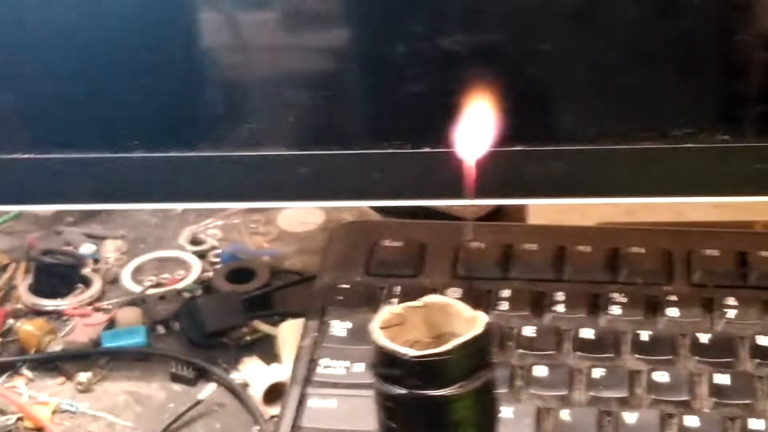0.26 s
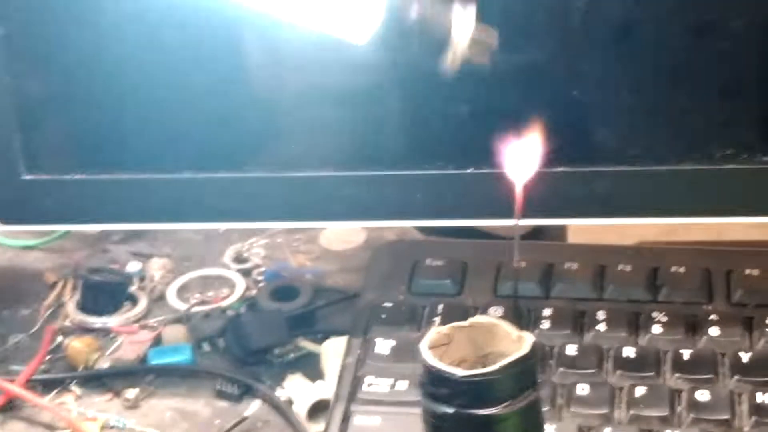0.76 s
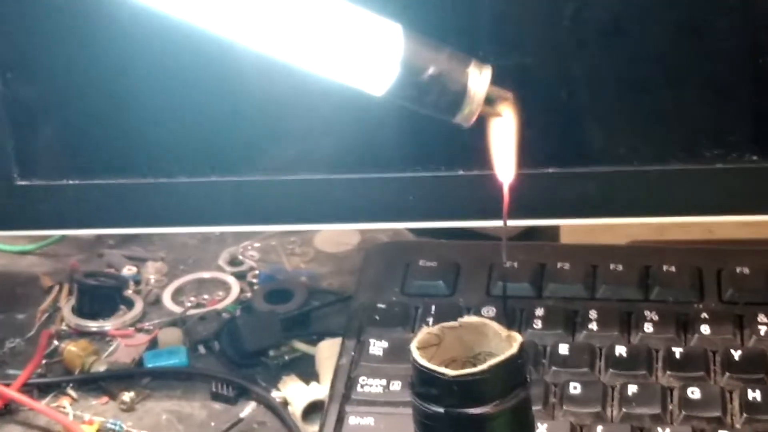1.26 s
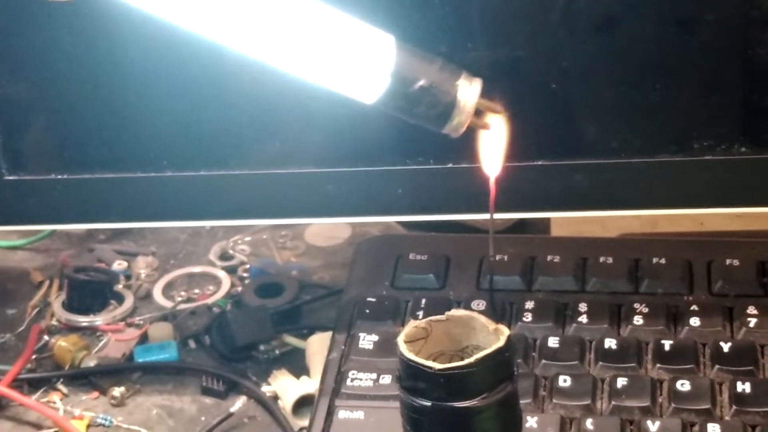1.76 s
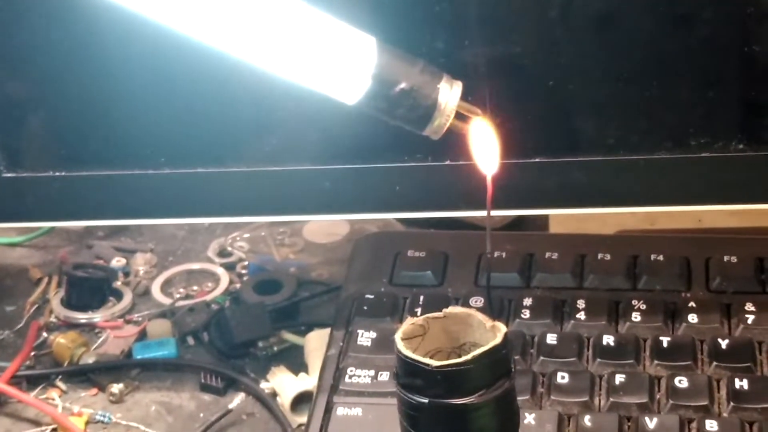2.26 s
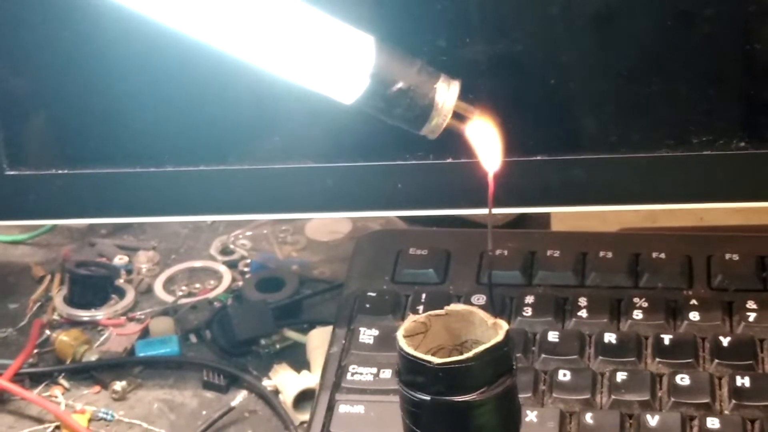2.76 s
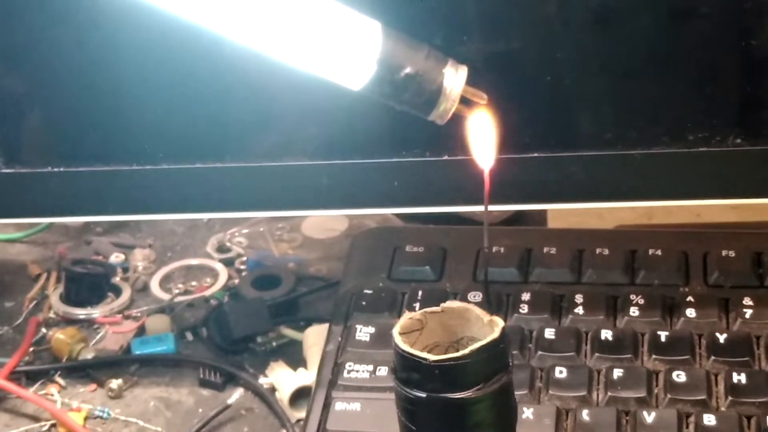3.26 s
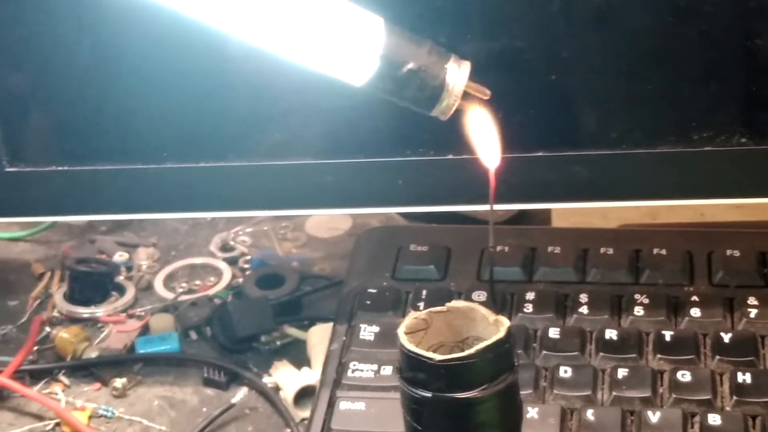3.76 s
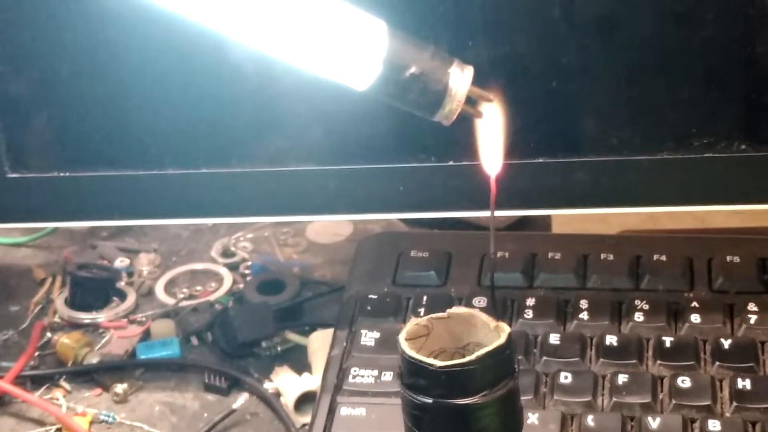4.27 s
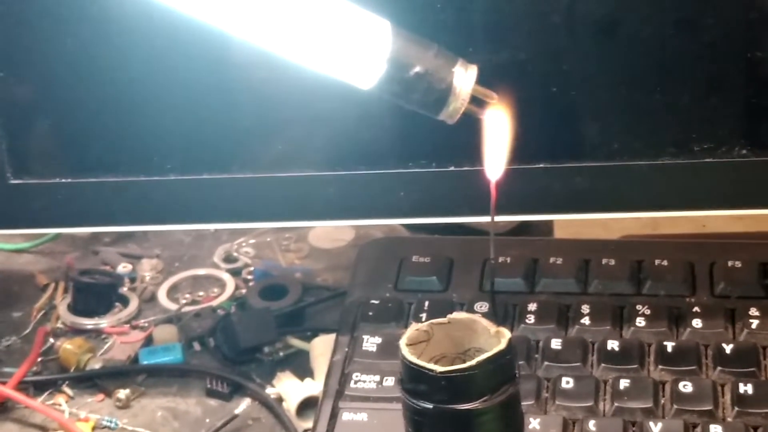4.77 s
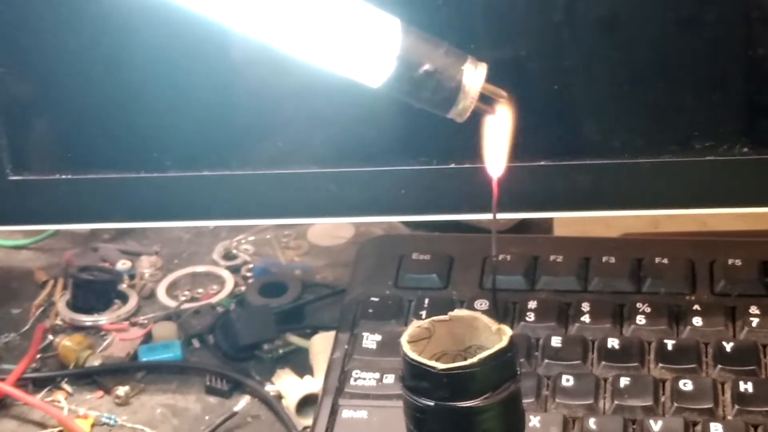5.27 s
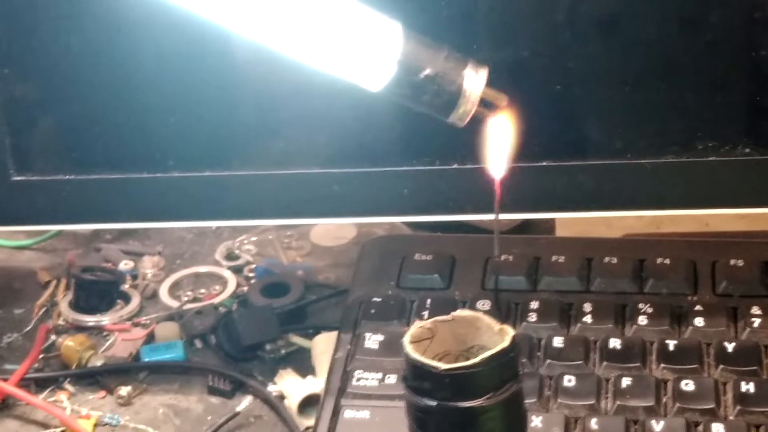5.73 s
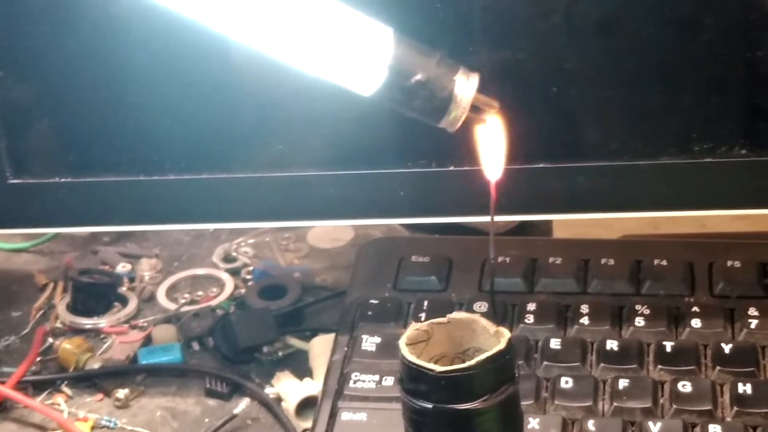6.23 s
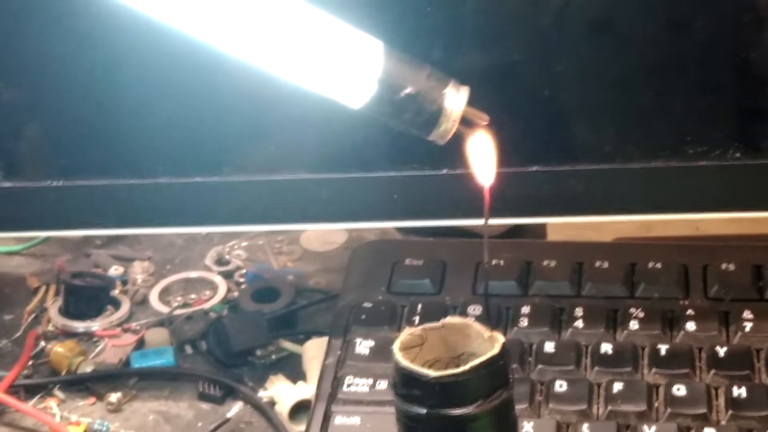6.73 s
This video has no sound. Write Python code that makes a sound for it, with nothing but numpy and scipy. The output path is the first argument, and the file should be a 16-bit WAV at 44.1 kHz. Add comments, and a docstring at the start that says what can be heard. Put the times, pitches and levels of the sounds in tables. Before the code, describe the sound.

After a second of fan noise with a dull knock and a tick, an electric flame spits bright, dense, uneven crackles until the end.

```python
"""Plasma arc on a workbench

A small plasma flame burns on a wire tip; a lamp tube is brought to it and the arc spits and sizzles.
Each spit is a burst of tiny random discharges, echoed by the bench and the room, after one dull knock and a tick.
A cooling fan adds shaped noise and lines at multiples of its shaft rate, and the mains adds a steady hum.
Two microphone ports hear it, and each channel subtracts the delayed sound of the other port."""
import sys
import numpy as np
from scipy import signal
from scipy.fft import rfft, irfft
from scipy.io import wavfile
from scipy.ndimage import uniform_filter1d

SR = 44100
rng = np.random.default_rng(int(sys.argv[2]) if len(sys.argv) > 2 else 0)


def waveform_to_disk(signal):
    """Save audio, clipped to [-1, 1], as 16-bit WAV at the path in sys.argv[1]."""
    frames = np.transpose(np.atleast_2d(signal))
    scaled = np.clip(frames, -1, 1) * 32767
    samples = np.round(scaled).astype(np.int16)
    wavfile.write(sys.argv[1], SR, samples)


def volts_from_decibels(level):
    """Turn decibel levels (scalar or array-like) into linear amplitude factors."""
    exponent = np.asarray(level, float) / 20
    return 10 ** exponent


N = 308700

# loud and lone spits of the arc: start_s [s], level_db [relative dB], length_ms [ms],
# low_db [dB, weight of the lower crackle]
SPITS = [(1.191, -47.5, 1.2, 10.5), (1.2112, -38.5, 1.8, 0), (1.224, -38, 1.7, -11), (1.3422, -36, 4.3, 0),
         (1.38, -29.5, 2, -2.5), (1.397, -41, 1.7, -3), (1.4137, -35, .3, -5), (1.45, -37, 2.2, -3),
         (1.4935, -37.5, 6.5, -1), (1.5133, -43, 1.5, 4), (1.5214, -38.5, 13.4, 1),
         (1.5694, -39.5, 4.4, -3), (1.594, -37, 1.9, -4), (1.622, -35, 1.8, -1), (1.7025, -34, 3, -6),
         (1.711, -37.5, 7.6, -3), (1.724, -37, 4.3, -7), (1.7487, -42, 1.8, 0), (1.794, -42, 6.3, -3),
         (1.851, -44.5, 1.2, 6), (1.8974, -38, 0.62, -1), (1.9078, -38, .6, 2), (1.93, -37.5, 1.4, -1),
         (1.9539, -44, 1.5, 1), (1.968, -36, 3.9, 1), (1.9842, -36, 9.4, -0.5), (1.997, -37.5, 11.6, -6),
         (2.0224, -38, 2.2, -1), (2.058, -37.5, 1.5, 2), (2.093, -42, 2.2, 8), (2.132, -45, 1.5, -6),
         (2.14, -34.5, 0.31, -4), (2.1641, -36.5, 1.1, 1), (2.233, -37, 0.55, 3), (2.2617, -37, 1.8, 3),
         (2.2722, -35.5, 1.7, 1), (2.2916, -42, 14, 0), (2.3135, -32, 3.4, -3), (2.362, -38.5, 1.7, 5),
         (2.3682, -37.5, 3.9, -4), (2.3922, -35.5, 1.5, 5), (2.4225, -31, 4.5, -5), (2.436, -34, 1.5, 2),
         (2.442, -32.5, 4.3, -4), (2.462, -41, 3.9, -8), (2.481, -42, 0.65, 7), (2.504, -29.5, 0.32, -3),
         (2.523, -41, 1.3, 3), (2.538, -42, 1.4, 4), (2.568, -34.5, 0.27, -12), (2.672, -42, 2.4, -6),
         (2.7043, -42, 0.9, -5), (2.743, -43.5, 0.85, 11), (2.7827, -44, 1.5, -4),
         (2.7925, -36.5, 1.65, 6.5), (2.836, -38.5, 3.7, 1.5), (2.878, -33.5, 0.29, -4),
         (2.9475, -39.5, 1.5, 6), (2.962, -43, 13, -4), (2.9932, -35, 1.4, -4), (3.0008, -36, 5.2, 6.5),
         (3.025, -41, 22, 0), (3.049, -30, 4.3, -11), (3.0686, -39, 1.7, -5), (3.0874, -39, 1.3, 3),
         (3.0942, -44, 1.5, 10), (3.132, -33.5, 3.2, 4), (3.1516, -35.5, 2.9, -0.5),
         (3.171, -33, 11.4, -1.5), (3.1937, -37, 2.9, -6), (3.208, -36, 4.7, -1), (3.216, -37, 1.4, -7),
         (3.279, -45, 0.97, 12), (3.2897, -39, 1.7, 4), (3.3075, -41, 1.5, -3), (3.322, -43, 1.5, 2),
         (3.35, -40, 1.4, 4), (3.366, -36.5, 3.5, 3.5), (3.3895, -41, 1.3, -3), (3.3974, -33, 1.2, -3),
         (3.404, -32, 1.3, -3), (3.41, -35, 5.9, 0), (3.4501, -32, 2.7, -2), (3.456, -29, 5.9, -1),
         (3.4766, -37, 1.2, -9), (3.48, -43, 9.3, 5), (3.5004, -42, 4.5, 4), (3.529, -36, 2.5, 3),
         (3.553, -38, 1.4, 8), (3.5632, -30.5, 3.8, -5), (3.5861, -38.5, 2.8, -4), (3.6135, -40.5, 1.5, 3),
         (3.648, -33.5, 5.3, -16), (3.6884, -45.5, 6.4, 3), (3.784, -34.5, 0.44, 2.5),
         (3.911, -39, 0.57, -1), (3.939, -37.5, 4.6, 1), (3.9505, -36, 2.9, 2), (3.9729, -38, 1.3, -2),
         (3.984, -41, 1.3, -2), (4.023, -39, 1, 0), (4.0327, -40, 1.5, 2), (4.045, -37, 2.6, 2),
         (4.0587, -38, 2.1, 2), (4.082, -42.5, 1.9, 5), (4.1758, -40, 2, 4), (4.27, -41, 5.1, 1.5),
         (4.303, -43, 1.5, -2), (4.3607, -41, 6.2, -5), (4.397, -45, 1.4, -2), (4.4675, -43.5, 0.63, 10),
         (4.571, -50.5, 7.6, 7), (4.741, -46, 3.4, -1), (4.761, -43, 8, 2), (4.773, -38, 2.3, -2),
         (4.8083, -39.5, 1.5, -2), (4.8377, -42, 3.3, 4), (4.888, -40, 2, 3), (4.9979, -44, 1.5, -9),
         (5.022, -43.5, 0.25, 4), (5.065, -47, 1.5, 4), (5.1143, -43.5, 1.6, 5), (5.1362, -42.5, 3.2, 3),
         (5.22, -43, 2.9, 4), (5.275, -38.5, 2.8, -1), (5.288, -38, 2, -6), (5.32, -43, 5.6, 4),
         (5.331, -35.5, 3.5, -2), (5.399, -39, 1.5, 0), (5.406, -38, 2, 2), (5.412, -42.5, 8.6, 1),
         (5.4274, -32, 1.7, -10), (5.452, -38, 2.5, -7), (5.477, -46, 1.4, 0), (5.56, -34, 1.1, -21),
         (5.5933, -44, 1.5, 0), (5.6165, -45, 3.9, 3), (5.6686, -32, 1.26, -1), (5.7006, -41.5, 4.3, 3),
         (5.734, -36.5, 0.76, 7), (5.8, -37.5, 3.5, -6), (5.847, -45.5, 1.5, 3), (5.862, -46.5, 4.5, 5),
         (5.914, -43, 1.6, 6), (6.015, -38.5, 6.4, 5.5), (6.061, -35, 0.36, -1), (6.0972, -39, 1.8, 1),
         (6.1699, -33, 1.5, 5), (6.1826, -34.5, 4, -5), (6.191, -39, 1.3, -3), (6.228, -37, 3.5, -10),
         (6.3738, -40, 3.9, 3), (6.3955, -38, 1.6, 0), (6.399, -42, 14, 4), (6.4535, -43.5, 1.6, 2),
         (6.506, -40.5, 2.8, -1), (6.5253, -42, 1.4, 7), (6.5597, -39.5, 0.82, 6), (6.5905, -49, 1.1, 2),
         (6.612, -38.5, 4.2, -5), (6.6223, -31.5, 0.52, -7), (6.6865, -38.5, 0.29, 8),
         (6.7135, -41, 1.3, 2), (6.7159, -35, 4.2, 5), (6.7546, -33, 0.44, -8), (6.7638, -35.5, 2.1, 0),
         (6.826, -32, 4, -6), (6.8555, -37.5, 14.5, -0.5), (6.8739, -31, 0.44, -9),
         (6.8813, -36.5, 1.9, -4), (6.937, -35.5, 1.4, -11)]
# sizzle of small discharges, swelling while the lamp pins sit in the flame: time_s [s], level_db [relative dB]
SIZZLE = [(1.16, -82), (1.33, -67), (1.52, -51), (1.8, -61), (2.15, -57.5), (2.23, -53), (2.27, -39),
          (2.38, -50.5), (2.41, -54), (2.44, -53), (2.54, -49), (2.68, -63), (2.9, -58.5), (3.05, -46),
          (3.095, -47.5), (3.12, -62), (3.15, -45), (3.26, -51), (3.44, -46.5), (3.74, -60), (3.97, -61),
          (4.6, -68.5), (5.15, -62.5), (5.4, -59.5), (6.5, -58), (7, -63)]
# colour of one discharge: frequency_hz [Hz], level_db [relative dB]
ARC_COLOUR = [(1500, -6.5), (2500, -6), (4000, -3.5), (5800, -6.5), (7000, 0.5), (8500, -1), (10500, -1),
              (12300, -7), (14000, -10)]
# decay of the room: frequency_hz [Hz], t60_s [s, raised to 0.02 s where shorter]
ROOM_DECAY = [(1500, 0.017), (4000, 0.2), (8000, 0.1), (13000, 0.078)]
# spectrum of the fan air in the room: frequency_hz [Hz], density_db [relative dB per Hz]
AIR_SPECTRUM = [(38, -33), (55, 13), (80, -8), (170, -3), (420, 2.5), (750, -9.5), (1350, -15),
                (1850, -6.5), (2500, -15), (4400, -16.5), (5200, -23), (7800, -27.5), (10900, -25),
                (12600, -29.5)]
# slow swell of the fan air: time_s [s], level_db [relative dB]
AIR_SWELL = [(0, -53), (.5, -51.5), (.8, -54.5), (1.1, -56), (1.5, -51.5), (2, -53.5), (3, -53),
             (4.5, -53.5), (6, -53), (7, -54)]
# resonances of the fan housing: frequency_hz [Hz], width_hz [Hz], boost_db [dB]
HOUSING_MODES = [(239.7, 22, 9.5), (360, 16, 6), (395.4, 17, 4)]
# fan orders: order [multiple of the shaft rate], first_db [relative dB, first port],
# second_db [relative dB, second port], lead_rad [rad, lead of the second port]
FAN_ORDERS = [(5, -67, -69, -.65), (8, -66, -62, -1.1), (10, -63, -59, -.6), (12, -63, -73, -1),
              (14, -75, -68, -.7), (15, -70, -65, -2.1), (16, -67, -78, -1.6), (26, -73, -83, -.2),
              (28, -72, -78, -.4), (40, -61.5, -80, 2.9), (45, -68, -79, 1)]
# high orders from the motor windings: order [multiple of the shaft rate], level_db [relative dB, first port]
WINDING_ORDERS = [(82, -81), (86, -82), (90, -81), (94, -83), (98, -86), (253, -88), (257, -84), (261, -86)]
# drifting shaft rate, a little slower at the end: time_s [s], rate_hz [turns per s]
SHAFT_RATE = [(0, 40.6), (2.6, 40.63), (4.1, 40.53), (7, 40.51)]
# mains hum, one row: first_db, second_db [relative dB, each port], lead_rad [rad, lead of the second port]
MAINS_HUM = (-60, -64, -0.23)
# modes of the tick: frequency_hz [Hz], level_db [relative dB], t60_s [s]
TICK_MODES = [(1720, -7, 0.019), (3130, -10, 0.0073), (3550, -0.5, 0.012), (4280, -10, 0.011),
              (8560, -12, .004)]
# response of the second port against the first: frequency_hz [Hz], gain_db [dB]
FAR_PORT = [(60, -4), (130, 6), (300, -6), (1000, 3), (3000, -10), (7000, -0.5), (13000, -0.5)]
# share of the other port that is subtracted: frequency_hz [Hz], gain_db [dB]
CROSS_SHARE = [(60, -0.5), (140, -8), (300, -14), (1000, -2), (3000, 0), (7000, -7), (13000, -14.5)]

LEAD_MS, LEAD_SHARE, LEAD_RISE_MS = 5, .05, 1.0  # faint sparks build up before each spit
SNAP_DB, SNAP_MS = 13, 1.5  # extra spark at the peak of a spit; weaker the longer the spit is against SNAP_MS
FLUTTER_DB, FLUTTER_MS = 1.6, 1.2  # a spit burns in uneven clumps
TOP_SLOPE, TOP_SPREAD_DB = -.4, 2.0  # louder spits are duller at the top (dB per dB), and each differs
BENCH_MS, BENCH_DB = 0.711, -8  # echo off the bench top
ARC_SHADE_DB = -3  # the arc at the second port
ROOM_DB = -10
TICK_S, TICK_DB = .4988, -34
KNOCK_S, KNOCK_DB, KNOCK_HZ, KNOCK_T60_S = .1717, -32, 460, .03
MAINS_HUM_HZ = 120.1
PORT_MS = 0.4486  # travel time between the ports
RIGHT_TREBLE_DB = 3.0  # treble lift of the right channel
EDGE_HZ = 14100


def evened(x):
    """Normalisation: scales a signal to rms 1."""
    return x / np.sqrt(np.mean(x ** 2) + 1e-20)


def read(points, hz):
    """Interpolation: reads a spectrum on a log-frequency axis."""
    f, value = np.transpose(points)
    return np.interp(np.log(hz + 1), np.log(f + 1), value)


def curve(rows):
    """Interpolation: reads a curve of time at every sample."""
    s, value = np.transpose(rows)
    return np.interp(np.arange(N) / SR, s, value)


def shaped(x, response):
    """Linear filtering: multiplies the spectrum by a function of frequency."""
    return irfft(rfft(x) * response(np.fft.rfftfreq(N, 1 / SR)), N)


def drift(top_hz, count):
    """Superposition: slow sines of random phase make count wandering rows of rms 1."""
    t = np.arange(0, N + 441, 441) / SR
    rows = 0
    for f in np.geomspace(.3, top_hz, num=24):
        rows = rows + np.sin(2 * np.pi * (f * t + rng.random((count, 1)))) / np.sqrt(f)
    return np.array([np.interp(np.arange(N) / SR, t, evened(row)) for row in rows])


def discharges(size, per_s, spread_db):
    """Shot noise: tiny sparks of uneven size at random times; the ports hear different parts of the flame."""
    happens = rng.random(size) < per_s / SR
    height = volts_from_decibels(spread_db * np.minimum(rng.exponential(1, size), 3)) * happens
    return height[..., None, :] * rng.standard_normal((*size[:-1], 2, size[-1]))


def spits():
    """Enveloped shot noise: bursts swell, hold and die, longer ones more gradually; gives three tone layers."""
    bright, low, top = np.zeros((3, 2, N + 1200))
    t = np.arange(1200) / SR * 1000 - LEAD_MS  # ms from the start of the spit
    trains = discharges(size=(len(SPITS), len(t)), per_s=24000, spread_db=1.2)
    clumps = rng.standard_normal((len(SPITS), 1, len(t)))
    clumps = evened(uniform_filter1d(clumps, size=round(FLUTTER_MS / 1000 * SR), axis=2))
    trains = trains * volts_from_decibels(FLUTTER_DB * clumps)
    middle_db = np.median([row[1] for row in SPITS])
    chances = rng.standard_normal(len(SPITS))
    for (s, level_db, ms, low_db), train, chance in zip(SPITS, trains, chances):
        lead = LEAD_SHARE * np.exp(np.minimum(t, 0) / LEAD_RISE_MS)
        rise = np.clip(t / (.2 + .25 * ms), lead, 1)
        fall = np.exp(-np.maximum(t - ms, 0) / (.65 + .08 * ms))
        shape = np.sqrt(rise * fall)
        burst = shape * train / train.std()
        burst[:, np.argmax(shape)] += volts_from_decibels(SNAP_DB) * np.exp(-ms / SNAP_MS)
        # energy is set by level and length alone
        burst = burst * np.linalg.norm(shape) / np.linalg.norm(burst, axis=1, keepdims=True)
        top_db = TOP_SLOPE * (level_db - middle_db) + TOP_SPREAD_DB * chance
        at = round((s - LEAD_MS / 1000) * SR)
        bright[:, at:at + len(t)] += volts_from_decibels(level_db) * burst
        top[:, at:at + len(t)] += volts_from_decibels(level_db + top_db) * burst
        low[:, at:at + len(t)] += volts_from_decibels(level_db + low_db) * burst
    return bright[:, :N], low[:, :N], top[:, :N]


def sizzle():
    """Clustered shot noise: small random spits modulate a dense train of discharges."""
    t = np.arange(1200) / SR * 1000 - LEAD_MS  # ms
    small = volts_from_decibels(7 * np.minimum(rng.exponential(1, N), 2)) * (rng.random(N) < 220 / SR)
    small = abs(signal.oaconvolve(small, np.exp(np.minimum(t / 0.34, -t / 1.34)))[:N])
    lit = np.arange(N) / SR > SIZZLE[0][0]
    level = lit * volts_from_decibels(curve(SIZZLE)) * np.sqrt(0.015 + small / small.mean())
    return level * evened(discharges(size=(N,), per_s=9000, spread_db=2.5))


def arc():
    """Source and filter: spits and sizzle take the discharge colour and the comb of the bench reflection."""
    bright, low, top = spits()
    fizz = sizzle()

    def colour(hz):
        scatter = 1 / (1 + (hz / 10500) ** 6)  # the cluttered bench scatters the highest treble
        echo = 1 + volts_from_decibels(BENCH_DB) * scatter * np.exp(-2j * np.pi * hz * BENCH_MS / 1000)
        return volts_from_decibels(read(ARC_COLOUR, hz) + 6.0) * echo * hz ** 4 / (hz ** 4 + 1400 ** 4)

    high = lambda hz: 1 / (1 + (4800 / (hz + 1)) ** 4)
    airy = lambda hz: 1 / (1 + (10800 / (hz + 1)) ** 10)
    upper = shaped(bright + fizz, lambda hz: colour(hz) * high(hz) * (1 - airy(hz)))
    upper = upper + shaped(top + fizz, lambda hz: colour(hz) * airy(hz))
    lower = shaped(low + fizz, lambda hz: colour(hz) * (1 - high(hz)))
    return upper + lower


def tick():
    """Modal impact: something hard ticks once on the bench as a few decaying sines."""
    t = np.maximum(np.arange(N) / SR - TICK_S, 0)
    return sum(volts_from_decibels(TICK_DB + db - 60 * t / t60) * np.sin(2 * np.pi * hz * t) for hz, db, t60 in TICK_MODES)


def knock():
    """Modal impact: one low decaying sine, struck once, makes a dull knock."""
    t = np.maximum(np.arange(N) / SR - KNOCK_S, 0)
    return volts_from_decibels(KNOCK_DB - 60 * t / KNOCK_T60_S) * np.sin(2 * np.pi * KNOCK_HZ * t)


def room(x):
    """Reverberation: sparse reflections of random sign, each band dying at its own speed."""
    taps = np.zeros((2, SR // 2))
    starts = np.arange(100, SR // 2 - 20, 20)
    at = starts + rng.integers(0, 20, (2, len(starts)))
    np.put_along_axis(taps, at, rng.choice([-1., 1.], at.shape), 1)
    hz, t, z = signal.stft(taps, SR, nperseg=128)
    t60 = np.maximum(read(ROOM_DECAY, hz), .02)
    tail = signal.istft(z * volts_from_decibels(-60 * t / t60[:, None]), SR, nperseg=128)[1]
    return signal.fftconvolve(x, tail / np.linalg.norm(tail[0]), axes=1)[:, :N]


def fan_air():
    """Turbulence noise: a broad rush with drifting patches; the slow swell fades out towards the treble."""
    frames, hz = N // 1024 + 5, np.fft.rfftfreq(4096, 1 / SR)
    z = rng.standard_normal((frames, 2049, 5)).T
    patches = uniform_filter1d(uniform_filter1d(z[4], size=12, axis=0), size=3, axis=1)  # Hz, then time
    s, rush_db = np.transpose(AIR_SWELL)
    swell_db = np.interp(np.arange(frames) * 1024 / SR, s, rush_db) - rush_db.mean()
    housing_db = sum(db / (1 + (2 * (hz - centre_hz) / width) ** 2) for centre_hz, width, db in HOUSING_MODES)
    follows = 1 / (1 + (hz[:, None] / 1500) ** 2)
    spectrum_db = (read(AIR_SPECTRUM, hz) + housing_db)[:, None]
    z = (z[:2] + 1j * z[2:4]) * volts_from_decibels(spectrum_db + 1.3 * evened(patches) + follows * swell_db)
    air = signal.istft(z, nperseg=4096, noverlap=3072)[1][:, :N]
    return volts_from_decibels(rush_db.mean() + 7.0) * evened(air)


def steady_tones():
    """Periodic forcing: lines at shaft multiples and the mains hum, wavering in level and phase."""
    shaft, out = np.cumsum(curve(SHAFT_RATE)) / SR, np.zeros((2, N))
    lines = [(order * shaft, *rest) for order, *rest in FAN_ORDERS]
    lines += [(order * shaft, db, db + 1.5, 0) for order, db in WINDING_ORDERS]
    lines.append((MAINS_HUM_HZ * np.arange(N) / SR, *MAINS_HUM))
    wavers, slips = drift(6, count=len(lines)), drift(3, count=len(lines))
    for (turns, first_db, second_db, lead), waver, slip in zip(lines, wavers, slips):
        phase = 2 * np.pi * (turns + rng.random()) + .8 * slip
        level = np.sqrt(2) * volts_from_decibels(2.0 * waver)
        out += level * np.array([volts_from_decibels(first_db) * np.sin(phase), volts_from_decibels(second_db) * np.sin(phase + lead)])
    return out


def scene():
    """Diffraction: the second port is shaded, while long waves reach both alike."""
    near = arc() * volts_from_decibels([[0], [ARC_SHADE_DB]]) + (tick() + knock()) * np.array([[1], [.5]])
    first, second = near + volts_from_decibels(ROOM_DB) * room(near) + fan_air()
    alike = shaped(first, lambda hz: 0.5 / (1 + (hz / 500) ** 2))
    second = alike + shaped(second, lambda hz: volts_from_decibels(read(FAR_PORT, hz)))
    return np.array([first, second]) + steady_tones()


def roll_off(x):
    """The treble ends steeply here."""
    return signal.sosfilt(signal.butter(12, 16400, fs=SR, output="sos"), x)


def record(dry):
    """Pressure gradient: each channel is its port minus the delayed other; then hiss and band limits."""
    cross = lambda hz: volts_from_decibels(read(CROSS_SHARE, hz)) * np.exp(-2j * np.pi * hz * PORT_MS / 1000)
    pair = (dry - shaped(dry[::-1], cross)) * volts_from_decibels([[0], [-.8]])
    pair[1] = shaped(pair[1], lambda hz: volts_from_decibels(RIGHT_TREBLE_DB / (1 + (5000 / (hz + 1)) ** 2)))
    pair = pair + volts_from_decibels(-83.0) * rng.standard_normal((2, N))  # preamplifier hiss

    def band(hz):
        edge = (1 + (hz / EDGE_HZ) ** 180) ** -.5
        skirt = volts_from_decibels(-22) / (1 + (hz / EDGE_HZ / 1.03) ** 16)  # faint remainder past the steep edge
        return (edge + skirt) * hz ** 3 / (hz ** 3 + 45 ** 3)

    return roll_off(shaped(pair, band))


dry = scene()
out = record(dry)
waveform_to_disk(out)
```